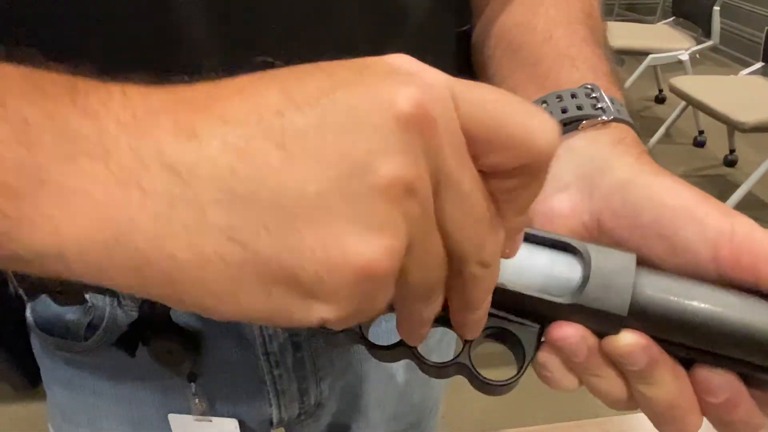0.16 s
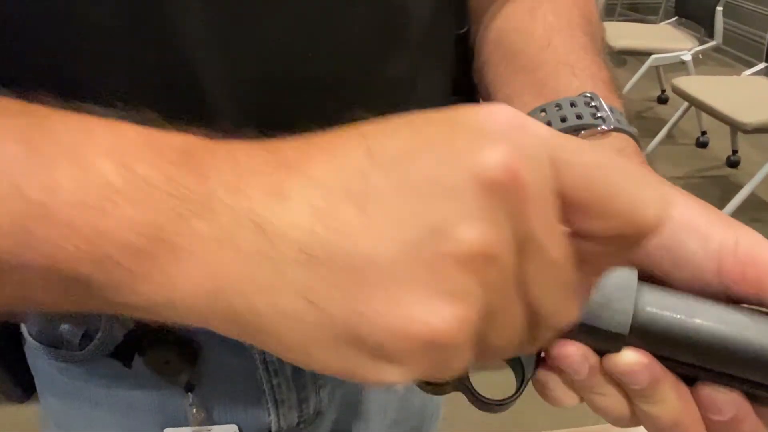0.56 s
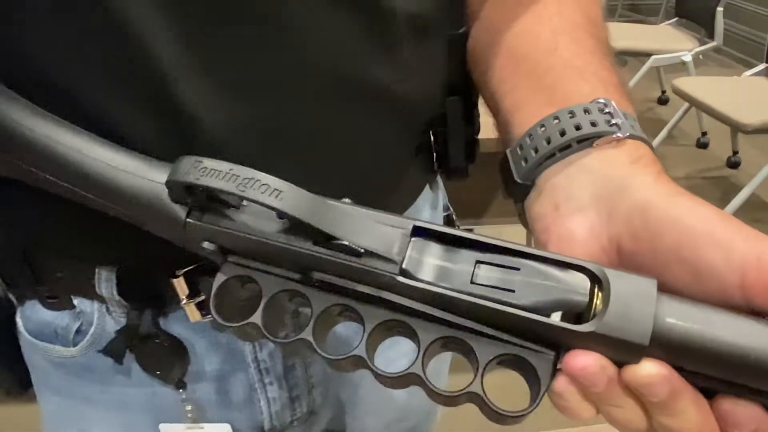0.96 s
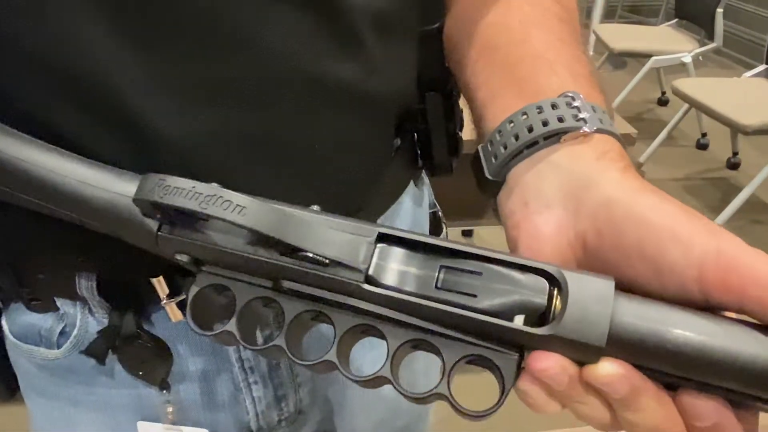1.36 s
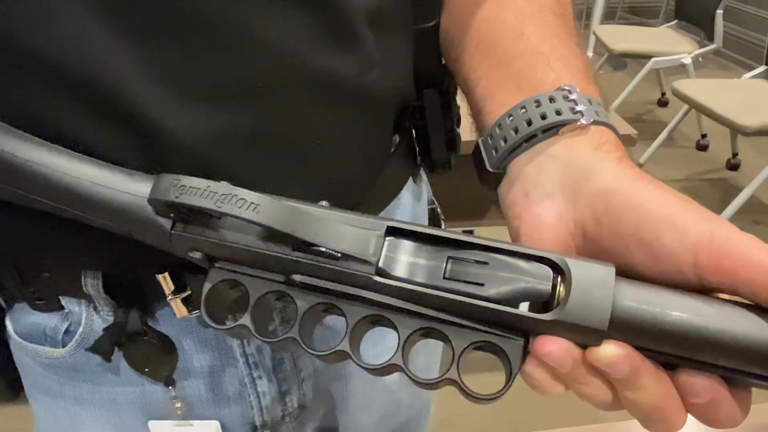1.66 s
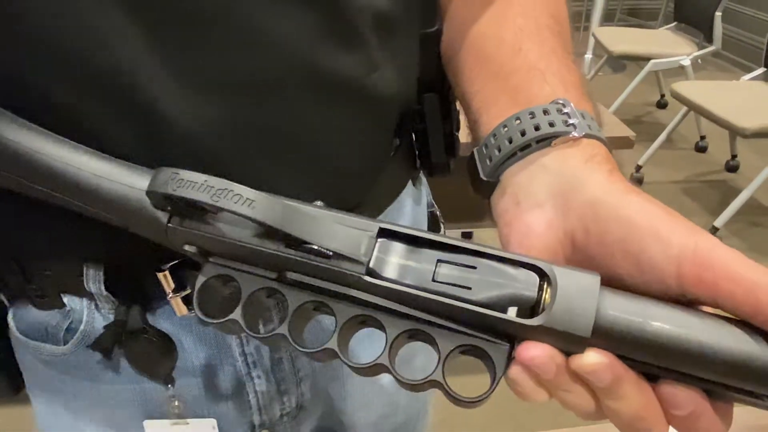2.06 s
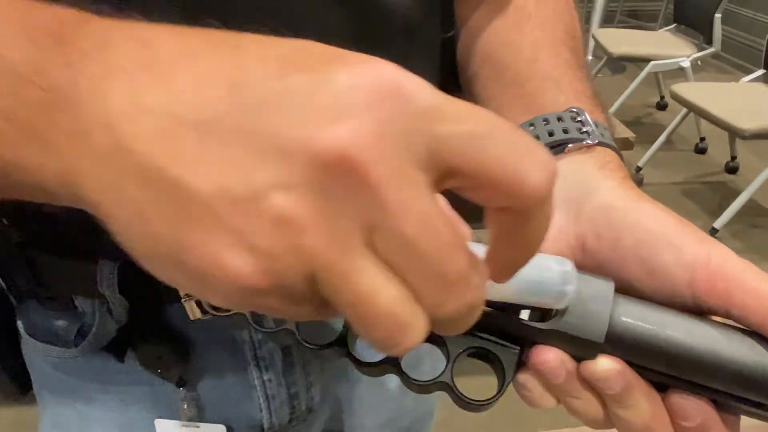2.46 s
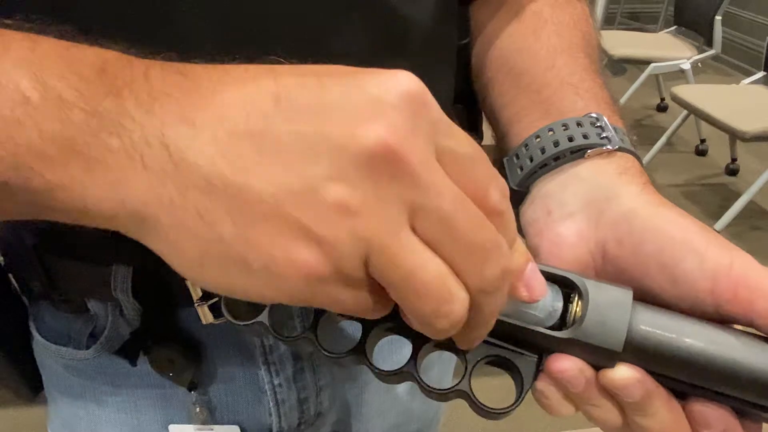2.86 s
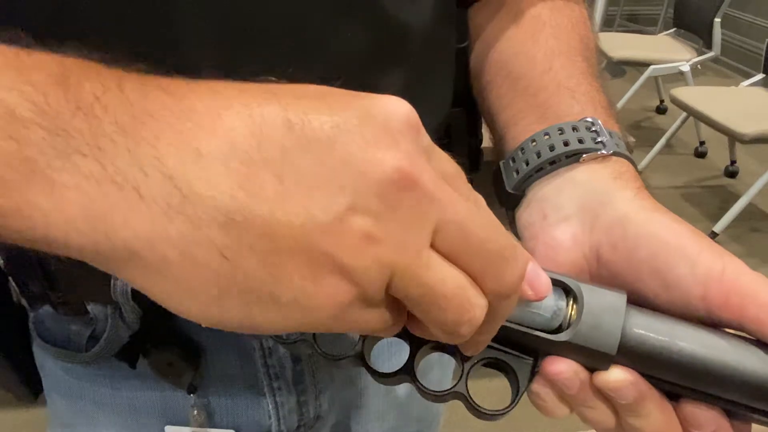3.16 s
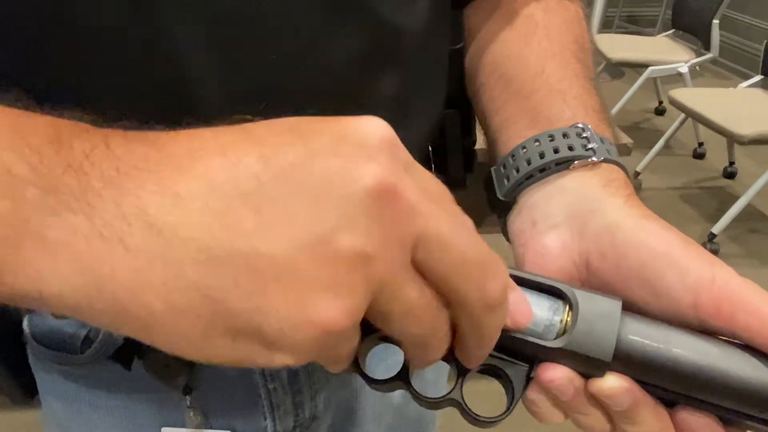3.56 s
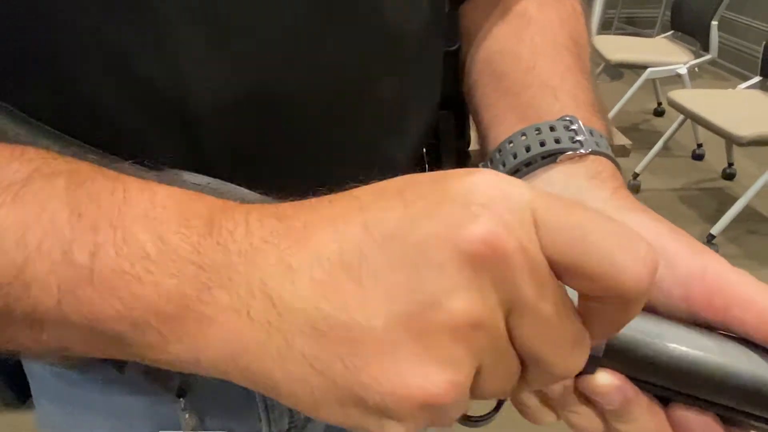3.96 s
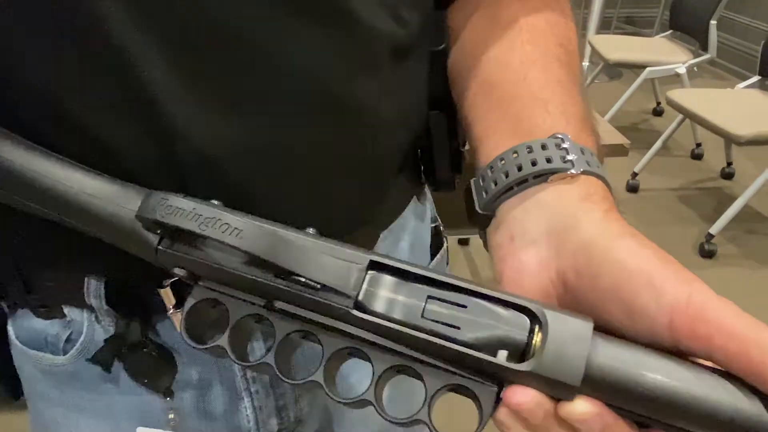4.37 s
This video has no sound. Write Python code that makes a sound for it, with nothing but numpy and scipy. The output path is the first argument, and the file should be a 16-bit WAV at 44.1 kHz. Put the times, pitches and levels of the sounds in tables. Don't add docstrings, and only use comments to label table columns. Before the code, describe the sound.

Close, bright latch snaps and dull hollow jolts as two dummy shells are pushed into a shotgun, over faint ventilation hum.

```python
import sys
import numpy as np
from scipy import signal
from scipy.fft import rfft, irfft
from scipy.io import wavfile
from scipy.ndimage import uniform_filter1d

SR = 44100
rng = np.random.default_rng(int(sys.argv[2]) if len(sys.argv) > 2 else 0)


def volts_from_db(level):
    exponent = np.asarray(level, float) / 20
    return 10 ** exponent


def transcribe(u):
    v = np.clip(np.atleast_2d(u).T, -1, 1)
    q = np.round(v * 32767).astype(np.int16)
    wavfile.write(sys.argv[1], SR, q)


N = 198846
LEAD = SR // 5

# freq_hz, density_db_per_hz
AIR = [(12, -56), (20, -14), (113, -9.5), (145, -8.5), (234, -7), (327, -10.5), (355, -8), (386, -12),
       (497, -15), (756, -19), (1060, -20), (1610, -29), (2180, -28.5), (3140, -30.5), (15900, -34.5)]
# freq_hz, waver_width_hz, level_db
HUM = [
    (115.5, 2.6, -65),
    (234.8, 21, -62.5),
    (358.3, 1.3, -57),
    (10000, 9.7, -73.5),
    (15350, 3.6, -73),
]
# freq_hz, density_db_per_hz
SIDE_HISS = [(12, -25.5), (20, -2.5), (74, 5), (261, -4.5), (365, -1), (972, -4), (2180, -2), (6870, 0),
             (14600, -2.5), (15900, 1)]
# freq_hz, t60_s
ROOM_T60 = [(300, 0.44), (800, 0.59), (2100, 0.64), (5500, 0.61), (9000, 0.48), (14600, 0.31)]
# delay_ms, level_db
ECHOES = [(2.7, -4), (5.6, -6.5), (9.1, -15.5), (11.5, -10.5), (16.0, -10.5), (22.0, -11.5), (40.5, -14.5),
          (44.0, -13.5), (78.0, -17)]

# freq_hz, density_db_per_hz
LATCH_OPEN = [(590, -41), (1000, -20.5), (1600, -7), (3500, 3), (4400, 6.5), (5000, -3), (6900, -0.5),
              (8800, -4), (9700, -1.5), (11700, -11.5), (12400, -6), (14000, -17.5), (14900, -18),
              (15800, -7)]
LATCH_OPEN_AGAIN = [(590, -44), (1000, -27), (2000, -5), (2300, -9.5), (3000, -1.5), (4300, 3.5),
                    (4900, -9), (7600, -4), (9900, -12), (10700, -5), (11700, -18.5), (12500, -10),
                    (14000, -25), (15300, -14)]
RIM = [(590, -39), (1000, -9), (1300, -7.5), (1380, -11.5), (1980, -8.5), (2140, -7.5), (2610, -4),
       (3030, -6), (5270, 1), (10400, -14), (11300, -0.5), (12800, -22), (14700, -10), (15800, -42)]
RIM_AGAIN = [(590, -33), (1000, -6), (1800, -9), (2600, -10), (4300, 1.5), (5500, -3), (7200, -3),
             (10200, -9), (10950, 5), (11600, -12), (13800, -22), (14500, 4), (15200, -18), (15800, -30)]
STOP = [(590, -39), (1000, -8), (1480, -10.5), (1750, -8), (2670, -3), (3560, -1), (4590, -2.5),
        (5700, 2.5), (7500, -9.5), (8200, -1.5), (8700, -8), (9800, -5.5), (12700, -11.5), (15800, -17)]
STOP_AGAIN = [(590, -42), (1000, -4), (1330, -33), (1700, -14), (2790, 1), (3520, 1), (4800, 0.5),
              (5800, -1.5), (9000, -8), (11200, -9.5), (11800, -2), (12400, -12.5), (15800, -13.5)]
LIFTER = [(590, -35), (1000, -6), (1500, -14.5), (2100, -7), (2500, -2.5), (3000, -6), (4200, 1.5),
          (5850, -5), (6500, -4), (8000, -7.5), (10500, -14), (13300, -16), (14300, -24.5), (15800, -39)]
LIFTER_EARLIER = [(590, -45), (1000, -17.5), (1550, -19.5), (1780, -4), (2120, -10), (3290, -7.5),
                  (3600, -7.5), (4090, 0.5), (4810, -13), (5520, 1.5), (6200, -12), (6800, -3),
                  (7290, -10.5), (15800, -26.5)]
SLIDE = [(590, -41), (1000, -3), (1320, -20), (1480, 0), (1700, -10.5), (2550, 3), (2890, -3.5), (5920, 1),
         (8670, -8.5), (14400, -12), (15800, -19.5)]
PLASTIC = [(590, -39), (1000, -11.5), (1080, -33), (1450, -11), (1760, -7.5), (2090, 1.5), (2520, -10.5),
           (2790, -14), (3320, -2), (4240, -9.5), (5460, -13), (6350, -20.5), (15800, -36)]
SHELL_TAP = [(590, -35), (1000, -4.5), (1400, -12.5), (2640, -1), (3300, -11.5), (4300, -1.5), (4810, -10),
             (5460, 2.5), (7200, -14.5), (8000, -4), (9800, -17), (14000, -25), (15000, -13), (15800, -18)]
TOUCH = [(590, -40), (1000, -16), (2000, -4), (2800, -4), (4300, 0), (5100, -9.5), (5900, 5), (7000, -18),
         (10000, -23), (15800, -27.5)]
DULL = [(590, -34), (1000, 1), (1270, 4), (1620, -7), (1840, 4), (2550, 2.5), (3140, -7), (4140, -4),
        (7900, -33), (15800, -31)]

# start_s, swell_s, fade_s, top_db, pitch_hz
SHUFFLES = [
    (1.595, 0.028, 0.13, -46.5, 696),
    (2.062, 0.0083, .12, -55, 764),
    (2.46, 0.017, 0.13, -49.5, 608),
    (4.215, 0.043, 0.054, -43, 745),
]
# start_s, swell_s, fade_s, top_db
RUBS = [
    (.52, 0.055, 0.055, -40.5),
    (.725, 0.012, 0.068, -32.5),
    (1.78, .04, .09, -66),
    (2.1, 0.13, .3, -64),
    (3.08, 0.07, .05, -36.5),
    (3.1995, 0.0024, .12, -29.5),
    (3.46, 0.012, 0.042, -28),
    (4.24, 0.048, 0.096, -65),
]
# start_s, peak_db, pitch_hz, t60_s
KNOCKS = [(.729, -45, 1490, 0.025), (.772, -34, 1416, 0.029), (.959, -43, 388, 0.043),
          (1.031, -39.5, 910, 0.036), (2.476, -44.5, 420, 0.033), (2.742, -29, 610, 0.0079),
          (3.282, -27.5, 1310, 0.0096), (3.478, -28.5, 313, 0.024), (3.555, -40.5, 296, 0.046),
          (.778, -37.5, 530, .04), (.336, -33.5, 897, 0.05), (2.746, -34, 907, 0.03),
          (4.255, -40, 1010, 0.076), (4.272, -37.5, 496, 0.054), (4.345, -49, 490, 0.025)]
# start_s, peak_db
TUBE_JOLTS = [(-.03, -34.5), (.33, -32), (.598, -37), (2.067, -42.5), (2.347, -50), (2.376, -41),
              (3.14, -33.5), (3.515, -36), (3.765, -34.5), (3.818, -41.5), (1.625, -53), (1.66, -50.5)]
# [start_s, peak_db]
TICKS = [
    (STOP, [(.536, -33), (.814, -27.5), (.9605, -38.5)]),
    (SLIDE, [(1.95, -53.5), (2.2915, -48.5), (2.4685, -37.5)]),
    (DULL, [(2.066, -57), (2.346, -41.5), (2.3795, -36.5), (2.47, -36), (3.7584, -29), (4.2535, -53)]),
]
# [start_s, peak_db, contact_ms]
GATE_SNAPS = [(LIFTER_EARLIER, [(-.06, -7.5, 2.9)]), (LATCH_OPEN, [(.3232, -17.5, 4.7),
              (.3334, -5.5, 2.5)]), (RIM, [(.5957, -17.5, 4.1)]), (SLIDE, [(.7272, -23.5, 5.1)]),
              (STOP, [(.7725, -13, 5.8)]), (PLASTIC, [(1.0268, -27.5, 5.3), (3.5155, -25.5, 3.0)]),
              (SHELL_TAP, [(2.5535, -22.5, 0.74)]), (LATCH_OPEN_AGAIN, [(2.7330, -18.5, 2.6),
              (2.7427, -1, 1.73)]), (TOUCH, [(3.0925, -41, 3), (3.113, -27.5, 2.8), (3.2705, -22, 4.4)]),
              (RIM_AGAIN, [(3.1347, -20, 3)]), (STOP_AGAIN, [(3.2790, -13.5, 4.7)]),
              (LIFTER, [(3.4660, -21, 2.2), (3.4768, -14.5, 2.7), (3.5155, -26, 1.2)])]


def read(points, hz):
    table_hz, value = np.transpose(points)
    return np.interp(np.log(hz + 1), np.log(table_hz + 1), value)


def add(mix, start_s, sound):
    part = mix[LEAD + round(start_s * SR):][:len(sound)]
    part += sound[:len(part)]


def air():
    freq_hz = np.fft.rfftfreq(N, 1 / SR)
    t_s = np.arange(N) / SR
    wash = irfft(rfft(rng.standard_normal(N)) * volts_from_db(read(AIR, freq_hz)), N)
    out = volts_from_db(-51) * wash / wash.std()
    for hz, width_hz, db in HUM:
        waver = irfft(rfft(rng.standard_normal(N)) * (freq_hz < width_hz), N)
        level_db = db + 2.5 + 0.92 * waver / waver.std()
        out += volts_from_db(level_db) * np.sin(2 * np.pi * hz * t_s)
    return out


def room(x, tail_db=-0.5, build_ms=0.98):
    taps = rng.standard_normal(SR)
    hz, t_s, bands = signal.stft(taps, SR, nperseg=256)
    decay = volts_from_db(-60 * t_s / read(ROOM_T60, hz)[:, None])
    tail = signal.istft(bands * decay, SR, nperseg=256)[1][:SR]
    tail *= 1 - np.exp(-(np.arange(SR) / SR * 1000 / build_ms) ** 2)
    tail *= volts_from_db(tail_db) / np.linalg.norm(tail)
    for ms, db in ECHOES:
        smear = 6 + 1.5 * ms
        scatter = rng.standard_normal(200) * np.exp(-np.arange(200) / smear)
        tail[round(ms * SR / 1000):][:200] += volts_from_db(db) * scatter / np.linalg.norm(scatter)
    return signal.fftconvolve(x, tail)[:len(x)]


def mode(freq_hz, hz, width_hz):
    damping = 1j * freq_hz * width_hz
    return damping / (hz ** 2 - freq_hz ** 2 + damping)


def part_response(points, freq_hz):
    bass = (100, points[1][1] - 30.0)
    log_gain = np.log(volts_from_db(read([bass] + list(points[1:]), freq_hz)))
    mirrored = np.r_[log_gain, log_gain[-2:0:-1]]
    return np.exp(np.conj(signal.hilbert(mirrored)))[:len(freq_hz)]


def rub(start_s, swell_s, fade_s, top_db, response, slips_per_s):
    t_s = np.arange(SR // 2) / SR
    swell = np.clip(t_s / swell_s, 0, 1) ** 0.73
    fade = volts_from_db(-23 * np.maximum(t_s - swell_s, 0) / fade_s)
    pressure = swell * fade * (t_s < swell_s + 2 * fade_s)
    slips = rng.standard_normal(len(t_s)) * (rng.random(len(t_s)) < slips_per_s / SR)
    sound = irfft(rfft(slips) * response(np.fft.rfftfreq(len(t_s), 1 / SR)), len(t_s))
    return start_s, volts_from_db(top_db) * pressure * sound / sound.std()


def shuffle(start_s, swell_s, fade_s, top_db, hz):
    def cloth(f):
        return mode(f, hz, hz / 1.85) ** 2 + volts_from_db(-30) * mode(f, 1300, 1260)
    return rub(start_s, swell_s, fade_s, top_db, cloth, 1500)


def shell_rub(start_s, swell_s, fade_s, top_db):
    return rub(start_s, swell_s, fade_s, top_db, lambda f: part_response(SLIDE, f), 2500)


def strike(peak_db, contact_ms, response, rise_ms=0.042):
    ms = np.arange(4096) / SR * 1000
    shape = (1 - np.exp(-ms / rise_ms)) * np.exp(-2 * ms / np.clip(contact_ms, .2, 30))
    force = rng.standard_normal(4096) * shape
    for _ in range(4):
        force = irfft(np.exp(1j * np.angle(rfft(force))))
        force *= shape / np.sqrt(abs(uniform_filter1d(force ** 2, 15)) + 1e-12)
    sound = irfft(rfft(force, 8192) * response(np.fft.rfftfreq(8192, 1 / SR)))
    return volts_from_db(peak_db) * sound / np.sqrt(uniform_filter1d(sound ** 2, 88).max())


def knock(start_s, peak_db, hz, t60_s, contact_ms=10):
    width_hz = 1.73 / np.clip(t60_s, .005, .3)

    def hollow(f):
        return mode(f, hz, width_hz) + volts_from_db(-12.5) * mode(f, 713, 620) ** 2
    return start_s, strike(peak_db, contact_ms, hollow, 0.57 * contact_ms)


def tube_jolt(start_s, peak_db):
    return knock(start_s, peak_db, hz=766, t60_s=0.069, contact_ms=7.3)


def snap(part, start_s, peak_db, contact_ms=1.73):
    return start_s, strike(peak_db, contact_ms, lambda f: part_response(part, f))


def scene():
    sounds = [snap(part, *row) for part, rows in GATE_SNAPS for row in rows]
    sounds += [snap(part, *row) for part, rows in TICKS for row in rows]
    sounds += [tube_jolt(*row) for row in TUBE_JOLTS]
    sounds += [knock(*row) for row in KNOCKS]
    sounds += [shell_rub(*row) for row in RUBS]
    sounds += [shuffle(*row) for row in SHUFFLES]
    near = np.zeros((4, N + LEAD))
    for k, (start_s, sound) in enumerate(sounds):
        add(near[k % 4], start_s, sound)
    wet = sum(room(x) for x in near)
    mid = (near.sum(0) + wet)[LEAD:] + air()
    return np.array([mid, mid])


def limiter(x):
    power_db = 10 * np.log10(abs(uniform_filter1d(x ** 2, 90, origin=44)) + 1e-12)
    fall_db = np.arange(N) * 146.0 / SR
    held_db = np.maximum.accumulate(power_db + fall_db) - fall_db
    over_db = np.maximum(held_db + 16.0, 0)
    return x / volts_from_db(0.46 * uniform_filter1d(over_db, 130, origin=64))


def side_signal(mid):
    freq_hz = np.fft.rfftfreq(N, 1 / SR)
    hiss = irfft(rfft(rng.standard_normal(N)) * volts_from_db(read(SIDE_HISS, freq_hz)), N)
    hiss *= volts_from_db(-61.5) / hiss.std()
    return hiss + volts_from_db(-52.5) * (mid - np.roll(mid, 40))


def overload(x):
    excess = x - np.clip(x, -.97, .97)
    smooth = np.hanning(90) / np.hanning(90).sum()
    return x - excess + signal.oaconvolve(excess, smooth[None], "same")


def band_limit(x):
    return signal.sosfilt(signal.butter(12, 16030, fs=SR, output="sos"), x)


def record(dry):
    mid = limiter(dry[0])
    side = side_signal(mid)
    edge = signal.firwin(301, 15800, window=("kaiser", 8), fs=SR)
    both = signal.oaconvolve(np.array([mid + side, mid - side]), edge[None], "same")
    mix = np.clip(overload(both), -1, 1)
    return band_limit(mix)


dry = scene()
out = record(dry)
transcribe(out)
```